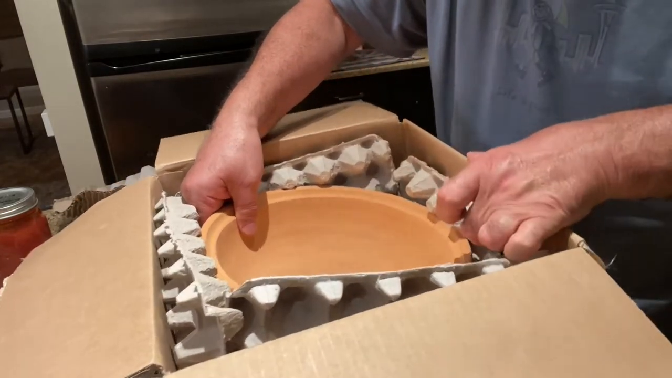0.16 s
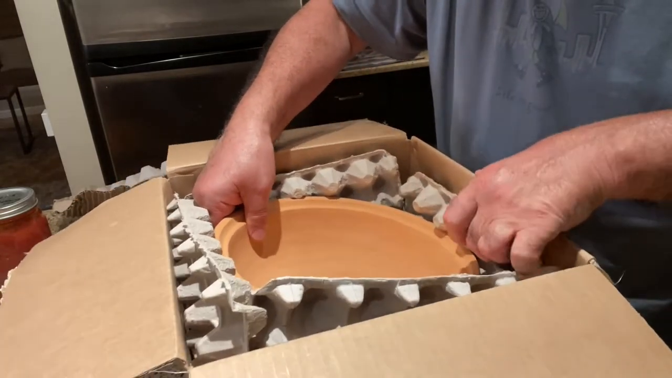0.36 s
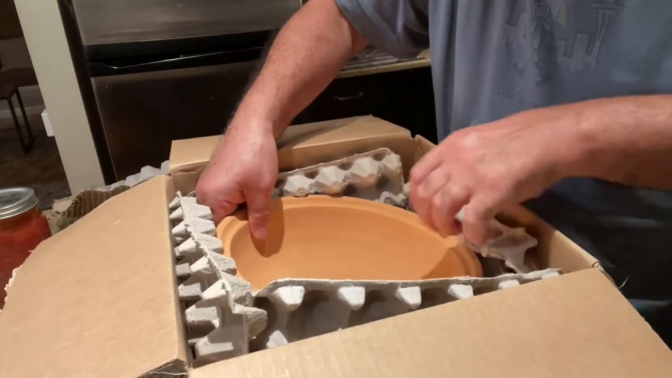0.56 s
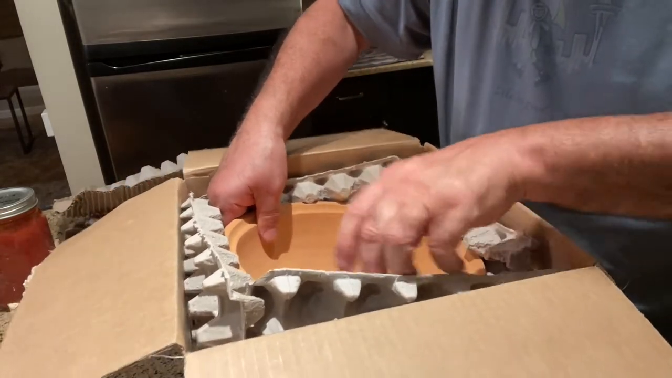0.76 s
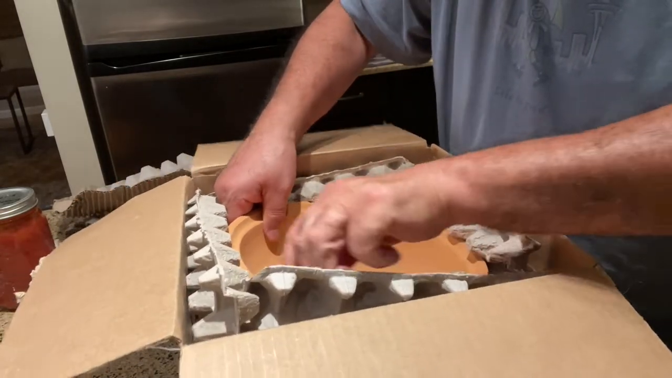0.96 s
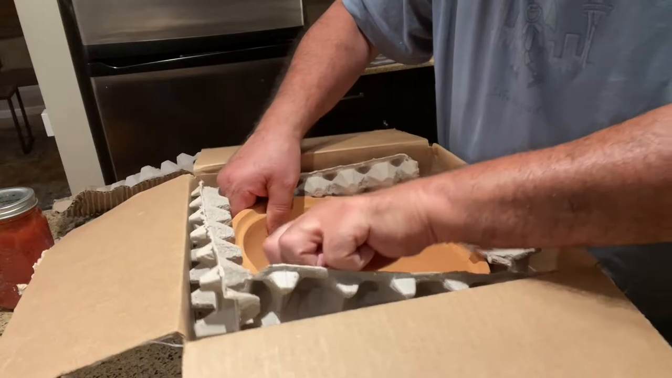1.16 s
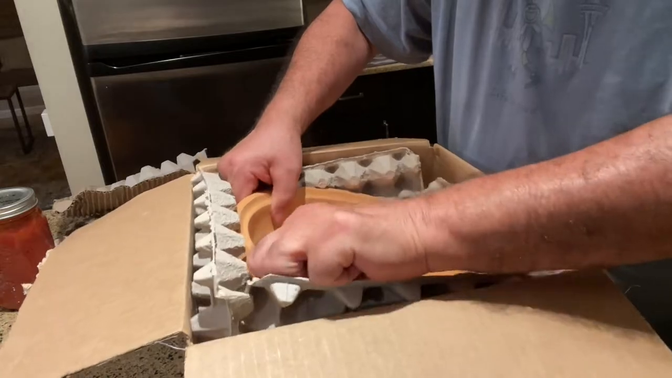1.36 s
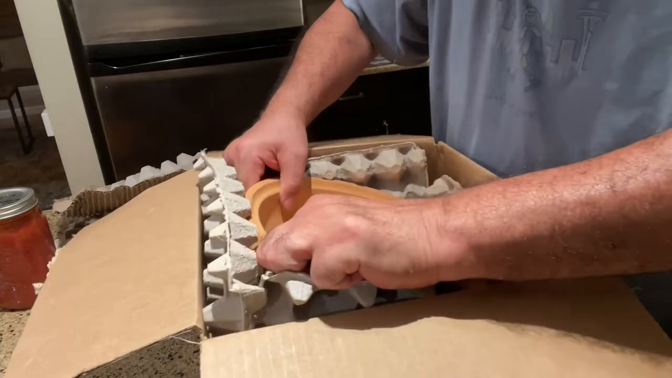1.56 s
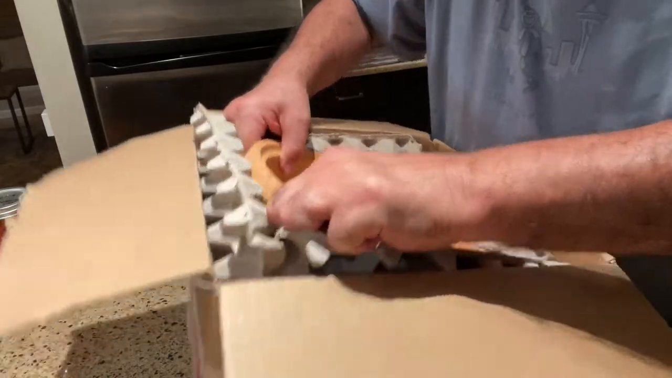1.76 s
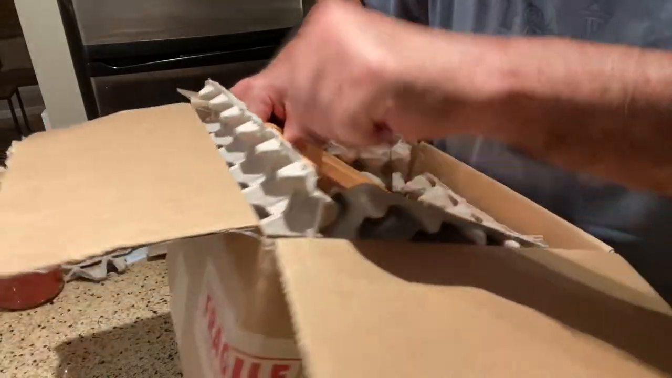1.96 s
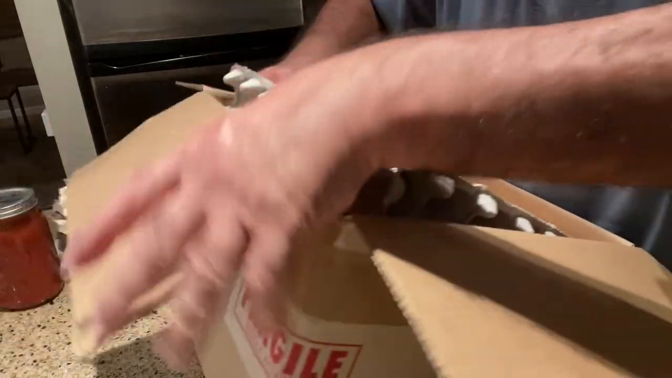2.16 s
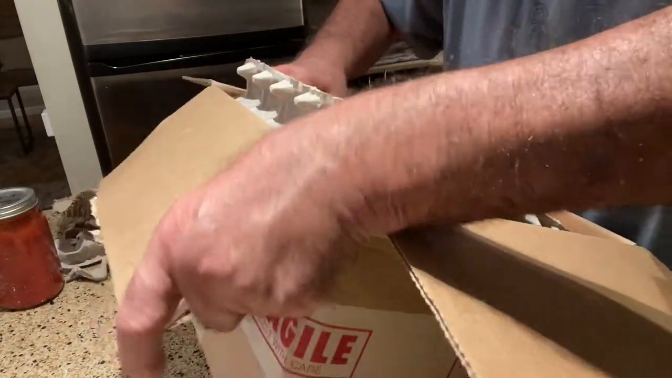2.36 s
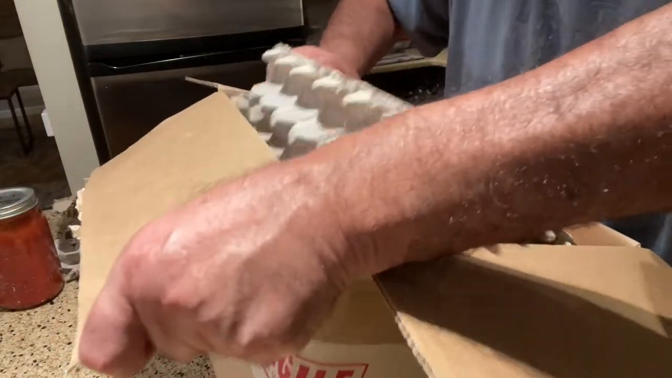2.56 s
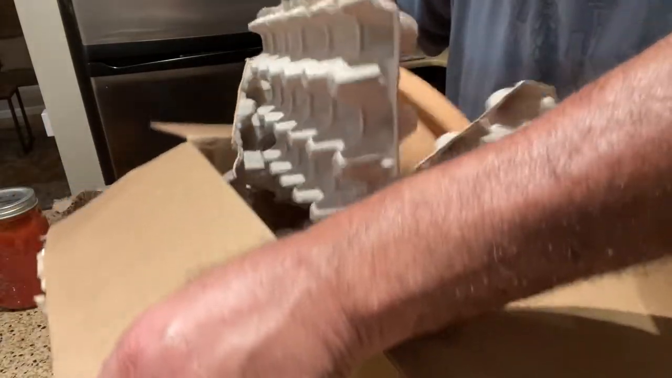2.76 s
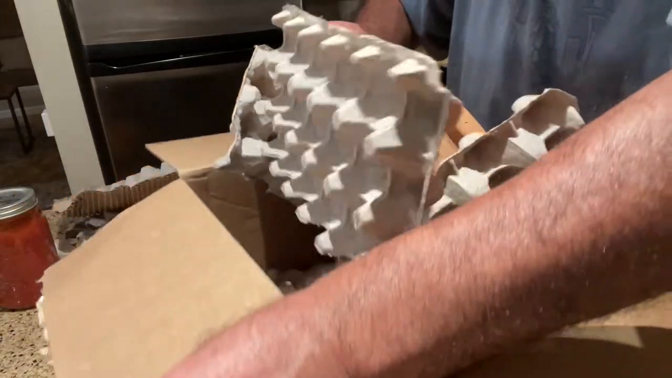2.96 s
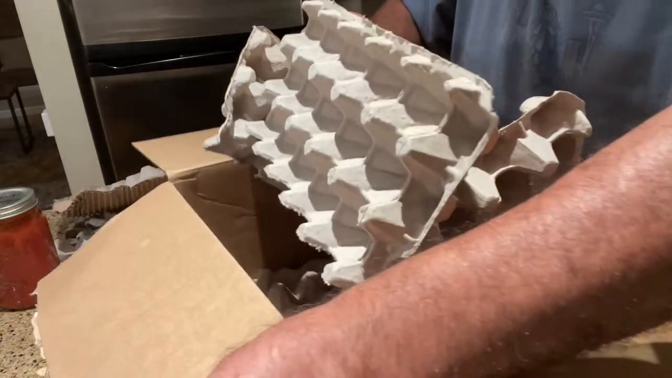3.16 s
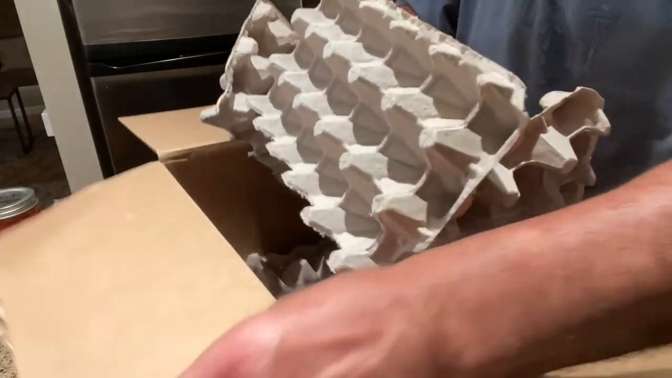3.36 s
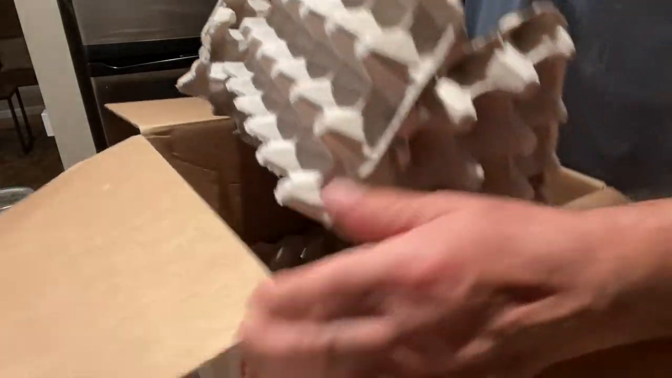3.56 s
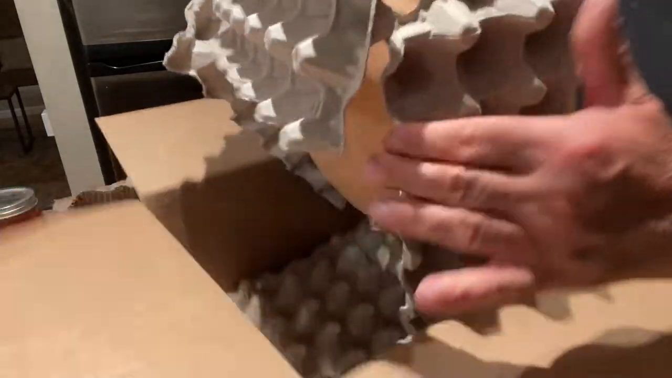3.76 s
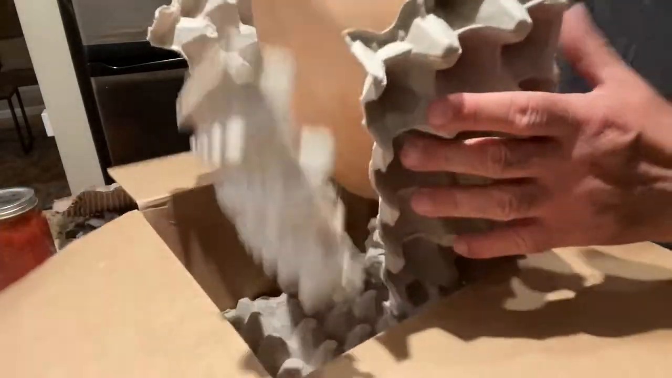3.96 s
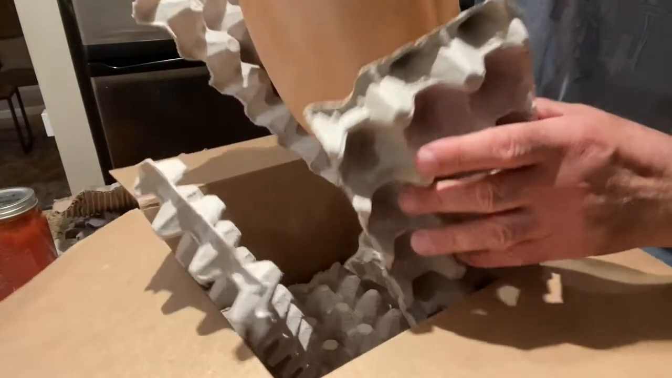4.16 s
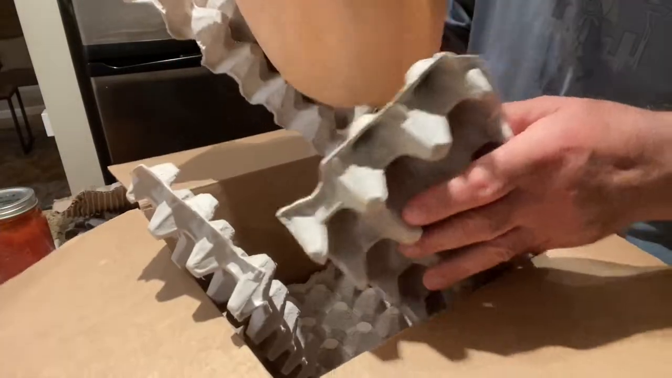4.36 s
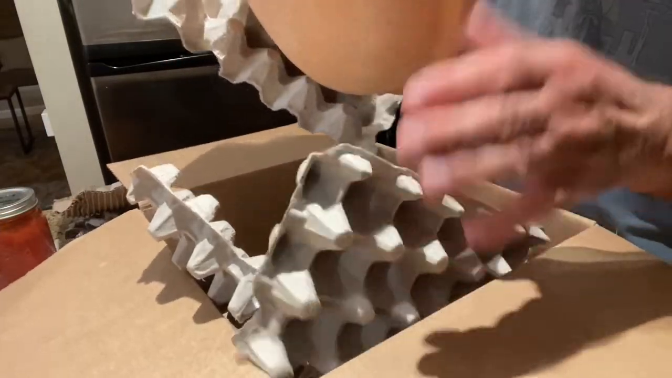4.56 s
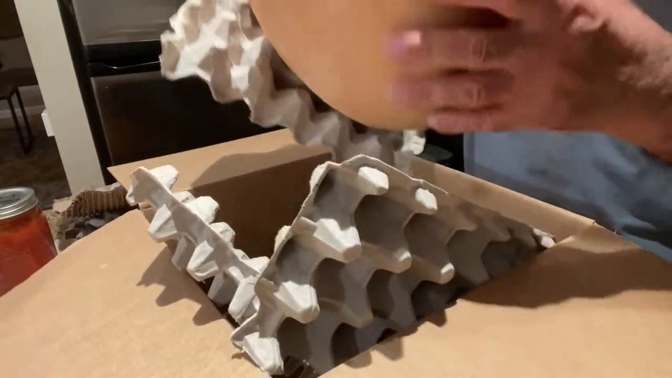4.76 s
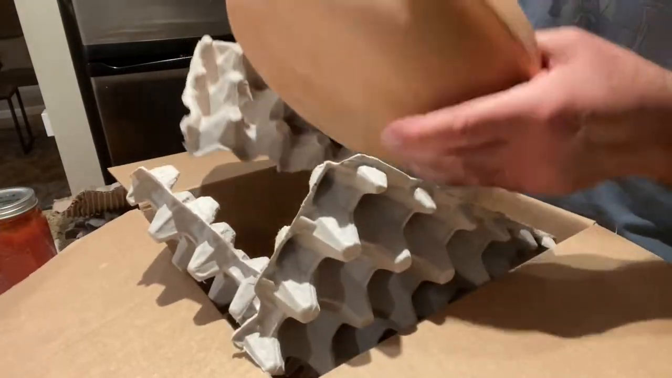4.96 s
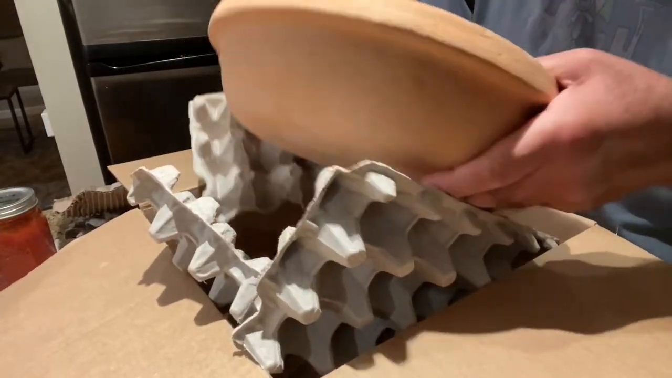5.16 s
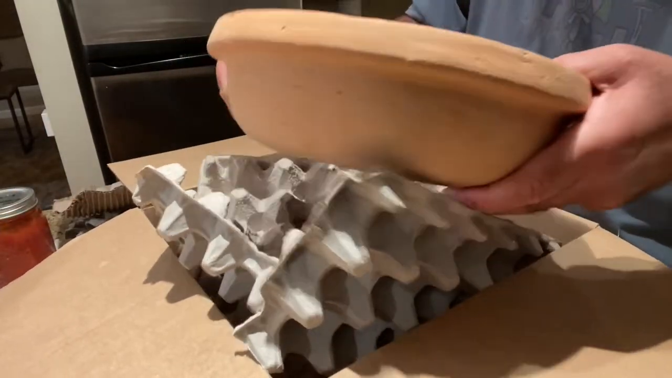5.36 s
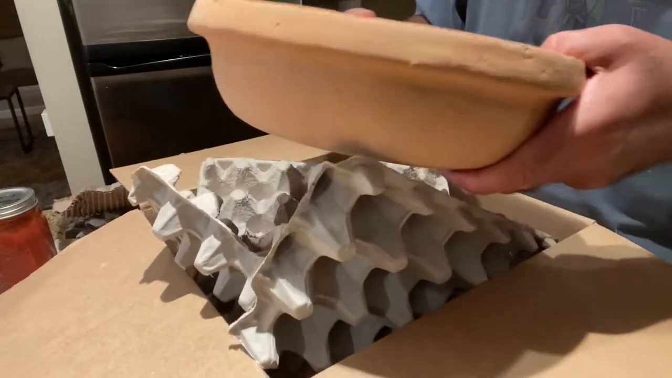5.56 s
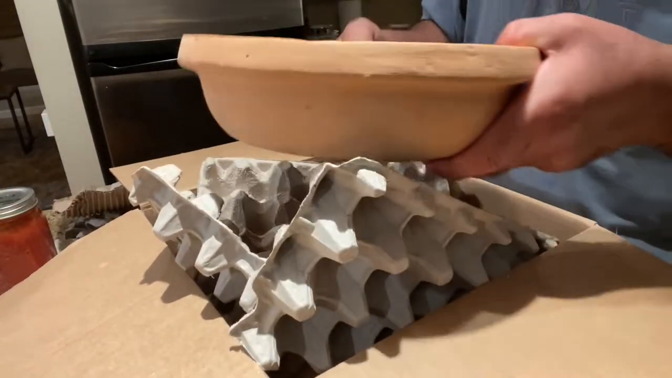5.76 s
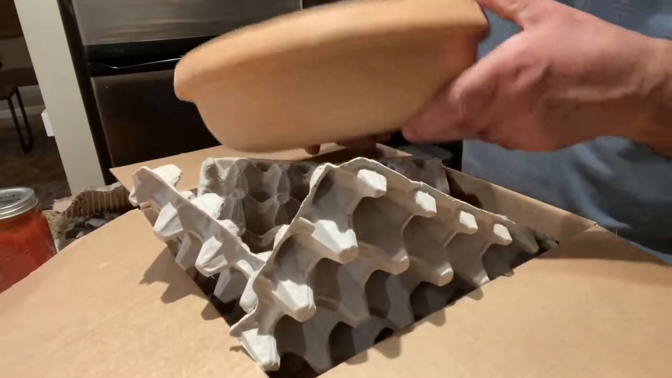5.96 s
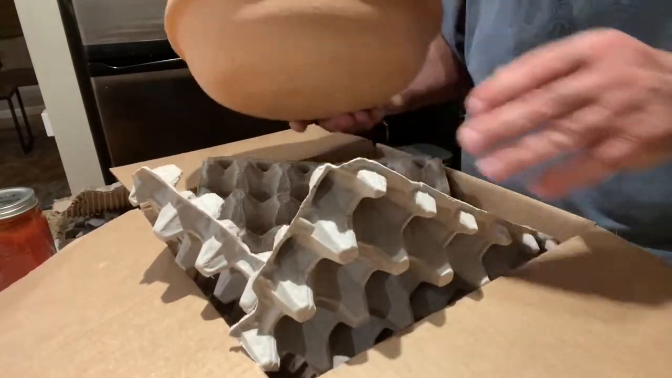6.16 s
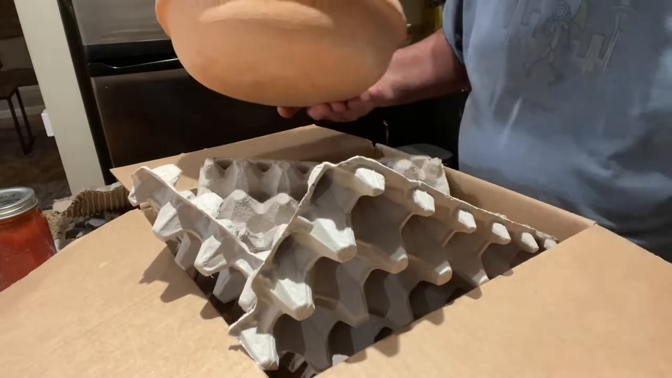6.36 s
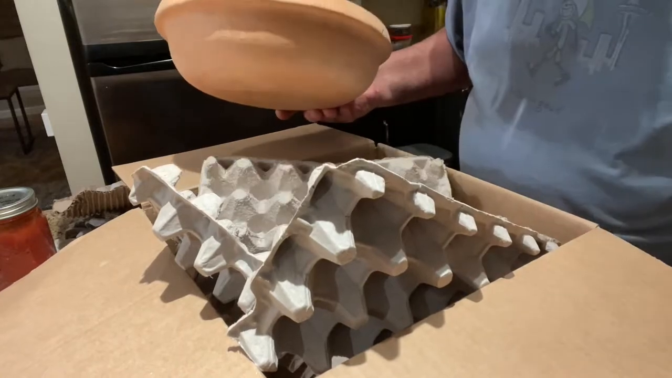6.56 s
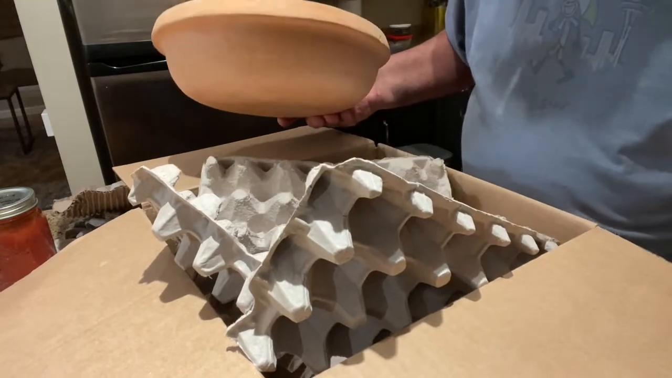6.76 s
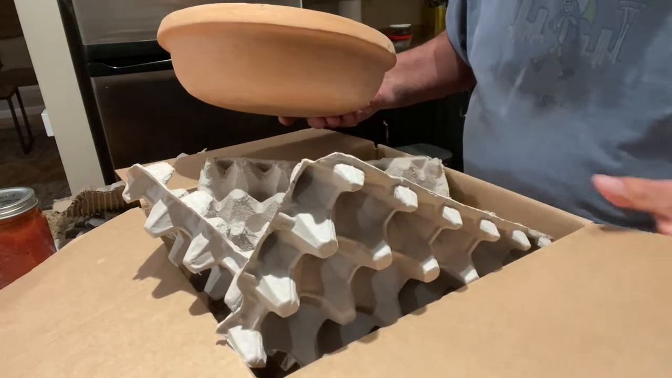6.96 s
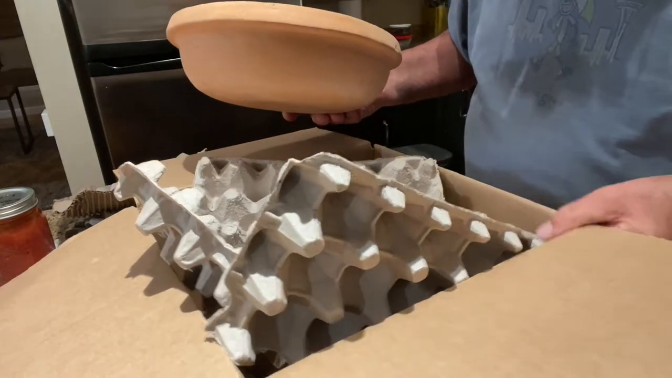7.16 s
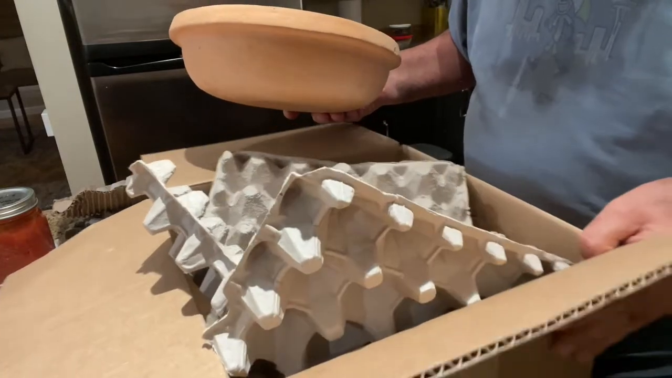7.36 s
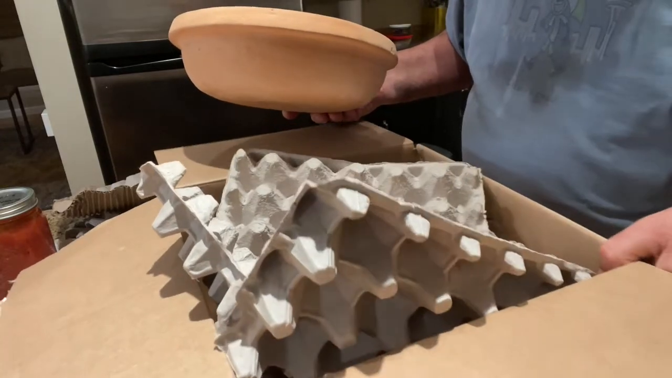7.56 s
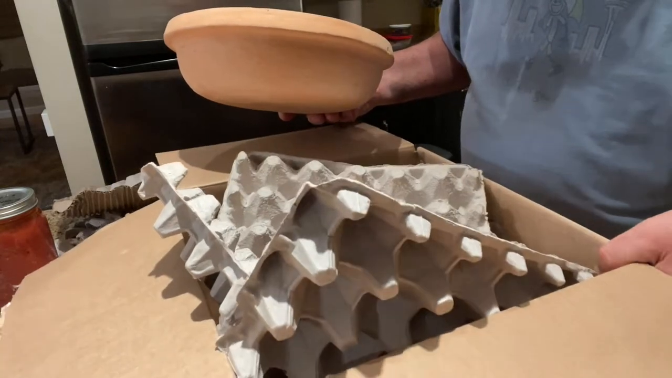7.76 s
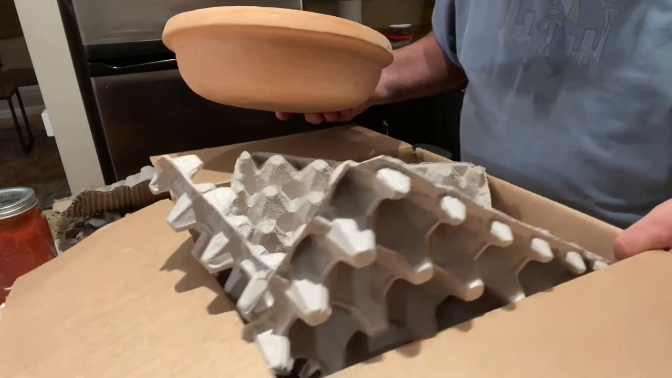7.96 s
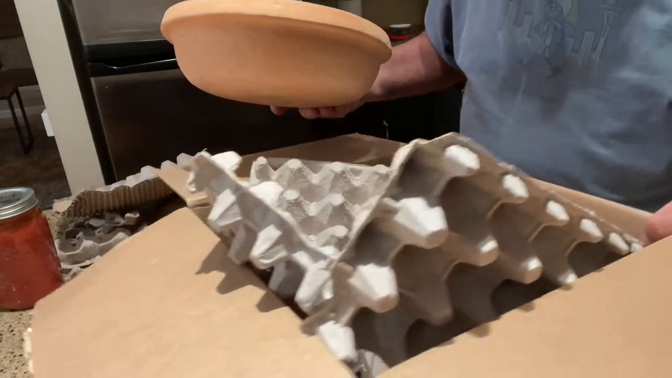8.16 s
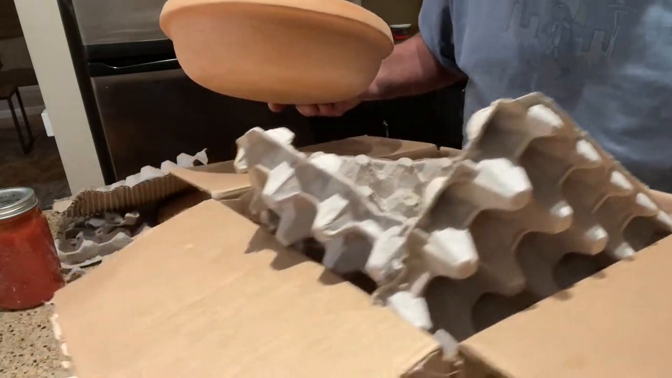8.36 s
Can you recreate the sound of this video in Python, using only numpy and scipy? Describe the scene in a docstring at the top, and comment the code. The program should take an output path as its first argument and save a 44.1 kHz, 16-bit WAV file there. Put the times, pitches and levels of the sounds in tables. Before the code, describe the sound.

Molded paper packing scrapes and rustles against cardboard, with hollow box thumps and pocking knocks as a clay pan is pulled free indoors.

```python
"""Paper scrapes and hisses on cardboard from the start, over faint room air and a hum; thumps and pocks join in.
A clay pan is worked out of a cardboard box packed with moulded paper trays, heard from close by in a kitchen.
Rubbing and scraping are random noise shaped by filters, some of it in one sliding pitch region.
Tray knocks are short noise bursts; box panels and the pan are sums of fading sine waves.
A palm rubs the bare pan so that it rings faintly, then a hand drags the box over the counter."""
import sys
import numpy as np
from scipy import signal
from scipy.fft import rfft, irfft, next_fast_len
from scipy.io import wavfile
from scipy.ndimage import uniform_filter1d, map_coordinates

SR = 44100
rng = np.random.default_rng(int(sys.argv[2]) if len(sys.argv) > 2 else 0)


def dump(signal):
    """Clip the signal to [-1, 1] and save it as 16-bit WAV at the path in sys.argv[1]."""
    limited = np.clip(np.atleast_2d(signal).T, -1, 1)
    pcm = np.round(limited * 32767).astype(np.int16)
    wavfile.write(sys.argv[1], SR, pcm)


N = 371322
T = np.arange(SR // 2) / SR  # time within one blow, in s


def amp(db):
    """Turn decibels into a plain multiplier."""
    return 10 ** (np.asarray(db) / 20)


def unit(x):
    """Scale a sound to an average (rms) strength of 1."""
    return x / np.sqrt(np.mean(x ** 2) + 1e-20)


def along(points, hz):
    """Read a value between (f/Hz, value) points, with frequency on a log scale."""
    f, v = np.transpose(points)
    return np.interp(np.log(hz + 1), np.log(f + 1), v)


def level_curve(rows):
    """Join (t/s, level/dB) points into one level per sample, as good as silent outside them."""
    s, db = np.transpose(rows)
    return np.interp(np.arange(N) / SR, s, db, left=-100, right=-100)


def wobble(rate):
    """A smooth random curve with this many random points a second."""
    knots = rng.standard_normal(int(N * rate / SR) + 4)
    return map_coordinates(knots, [np.arange(N) * rate / SR])


def filtered(x, response):
    """Pass x through a filter given as a function of frequency."""
    size = x.shape[-1]
    m = next_fast_len(size + 8192)
    spectrum = rfft(x, m) * response(np.fft.rfftfreq(m, 1 / SR))
    return irfft(spectrum, m)[..., :size]


def coloured(x, spectrum):
    """Shape the tone of x with a spectrum, then scale it to rms 1."""
    return unit(filtered(x, lambda hz: amp(along(spectrum, hz))))


def resonance(hz, centre, q):
    """Filter that rings at one pitch like a struck object; a higher q rings longer and purer."""
    damping = 1j * hz * centre / q
    return damping / (centre ** 2 - hz ** 2 + damping)


def fade(t60):
    """Dying away of one blow, by 60 dB in t60 seconds."""
    return np.exp(-np.log(1000) * T / t60)


def add(track, s, sound):
    """Mix a sound into a track at time s."""
    part = track[..., max(0, round(s * SR)):][..., :sound.shape[-1]]
    part += sound[..., :part.shape[-1]]


def slips(rate, spread_db, life):
    """Stick-slip rubbing: tiny noise bursts of uneven size at random moments, as a (direct, scattered) pair."""
    sizes = amp(spread_db * np.clip(rng.standard_normal(N), -2, 2))
    jumps = (rng.random(N) < rate / SR) * sizes
    energy = np.abs(signal.fftconvolve(jumps ** 2, fade(life / 2))[:N])
    return unit(np.sqrt(energy) * rng.standard_normal((2, N)))


def roaming(x, depth_db):
    """The contact point wanders, so each pitch region swells and sinks on its own."""
    z = signal.stft(x, nperseg=1024)[2]
    field = uniform_filter1d(rng.standard_normal(z.shape[1:]), size=5, axis=0)
    field = uniform_filter1d(field, size=9, axis=1)
    return signal.istft(z * amp(depth_db * unit(field)), nperseg=1024)[1][:, :N]


# tone of the room air: (f/Hz, relative level/dB)
AIR_TONE = [(15, -20), (25, -16.5), (55, 1.5), (119, -12.5), (156, -18), (209, -23), (313, -16), (368, -24),
            (2700, -29.5), (8810, -30), (11500, -32.5), (14300, -33), (15500, -25)]
# steady hum of a kitchen appliance: (f/Hz, level/dB)
APPLIANCE_HUM = [(48.4, -68.5), (155, -62), (307, -76)]


def background():
    """Faint noise of room air that rises and sinks a little, and an appliance humming with unsteady sines."""
    hum = np.zeros(N)
    for hz, db in APPLIANCE_HUM:
        angle = 2 * np.pi * hz * np.arange(N) / SR + .4 * wobble(5.0)
        hum += amp(db) * np.sqrt(2) * np.sin(angle)
    drift_db = 1.5 * wobble(7)
    air = amp(-52.5 + drift_db) * coloured(rng.standard_normal((2, N)), AIR_TONE)
    return air + np.array([hum, np.zeros(N)])


# steady contact while the packed pan works loose: (t/s, friction level/dB)
PULL_FRICTION = [(0.0, -36.5), (0.17, -48.5), (0.67, -54), (0.87, -35.5), (1.39, -27.5), (1.73, -31.5),
                 (1.93, -46.5), (2.15, -48.5), (2.28, -37), (2.67, -25.5), (3.31, -39.5), (3.55, -64),
                 (3.7, -29), (3.91, -29.5), (4.85, -51.5), (5.19, -39.5), (5.24, -26), (5.49, -50.5),
                 (5.6, -58)]
# steady contact while the box is dragged: (t/s, friction level/dB)
DRAG_FRICTION = [(6.7, -80), (6.8, -40.5), (6.924, -46), (7.476, -41), (7.614, -39.5), (7.96, -54.5),
                 (8.112, -55), (8.42, -71.5)]
# brushing strokes of paper over card, and a few very short bright ticks as trays and pan knock:
# (start t/s, length t/s, scrape level/dB, swell over the stroke level/dB, hiss over scrape level/dB)
STROKES_AND_TICKS = [(0.0, 0.037, -34, -8, -32), (0.239, 0.052, -35, 13, -12), (0.337, 0.1, -34.5, 6, -4.5),
                     (0.606, 0.082, -38, 16.5, -13.5), (0.657, 0.15, -35, -8.5, -4.5),
                     (0.799, 0.033, -28.5, 13, -7), (0.868, 0.077, -37, -8, -0.5),
                     (0.954, 0.096, -25.5, -3, -18.5), (1.077, 0.07, -25.5, 2.5, -14),
                     (1.181, 0.17, -23.5, -2.5, -12.5), (1.426, 0.063, -23.5, 2, -14),
                     (1.54, 0.031, -27.5, 8, -29.5), (1.649, 0.015, -33, -3, 0.5),
                     (1.709, 0.0075, -14.5, 9.5, -9.5), (1.826, 0.087, -36, 2, -7.5),
                     (2.083, 0.029, -32.5, 9, 2), (2.155, 0.02, -35.5, 13, 1.5),
                     (2.183, 0.032, -30.5, 7, -3.5), (2.265, 0.011, -27.5, 8, 3), (2.28, 0.13, -37.5, 3, 0),
                     (2.444, 0.12, -18.5, 3.5, -11), (2.544, 0.3, -24, -14, -16),
                     (3.197, 0.098, -40, 2.5, 4.5), (3.354, 0.1, -37.5, 1.5, -2.5),
                     (3.469, 0.036, -44, 20, 2.5), (3.507, 0.19, -22.5, -8.5, -10.5),
                     (3.663, 0.053, -36, 2, 1.5), (3.731, 0.064, -29, -17, -3), (3.924, 0.19, -35, 6, -7.5),
                     (4.247, 0.13, -36, 5.5, -9.5), (4.409, 0.047, -31.5, -3, -7),
                     (4.53, 0.0027, -20, 1, -20), (4.712, 0.096, -60, -5, 11.5),
                     (4.877, 0.2, -40, -13, -8.5), (5.034, 0.14, -33, 10, -6.5),
                     (5.233, 0.094, -30.5, 13.5, -12.5), (5.343, 0.029, -28, 2, -3),
                     (6.731, 0.1, -45, -8.5, 1), (6.875, 0.12, -42, 3.5, 2), (7.13, 0.11, -32.5, 3.5, -9.5),
                     (7.39, 0.068, -51.5, 2, 13.5), (7.624, 0.09, -36.5, 7.5, -3),
                     (7.753, 0.37, -45.5, -5, -21)]
# the bite takes a fixed time, or a share of the length in short strokes; then the release time
STROKE_ATTACK_S, STROKE_ATTACK_SHARE, STROKE_T60_S = 0.041, 0.29, 0.1
FIRM_DB = -32  # friction level of a firm contact
FIRM_HISS_DB, HISS_GROWS = -46.5, 0.41  # hiss at firm contact, and its dB per dB of pull friction
DRAG_SCRAPE_DB, DRAG_FIBRE_DB, DRAG_SHAKE_DB = 3.5, 1, -1  # over the friction of the dragged box
# panel shudder at firm contact, its dB per dB of friction, and how much of the strokes reaches it
SHAKE_DB, SHAKE_GROWS, SHAKE_BY_STROKE_DB = -32.5, 0.81, -6


def friction():
    """Strokes and ticks bite, swell or sink and let go over steady contact; both also shake the panels."""
    pull_db, drag_db = level_curve(PULL_FRICTION), level_curve(DRAG_FRICTION)
    # energies (squared gains) are added up, and the roots are taken at the end
    pull_hiss_db = FIRM_HISS_DB + HISS_GROWS * (pull_db - FIRM_DB)
    hiss = amp(pull_hiss_db) ** 2 + amp(drag_db + DRAG_FIBRE_DB) ** 2
    strokes = np.zeros(N)
    for s, length, db, swell_db, hiss_db in STROKES_AND_TICKS:
        bite = np.clip(T / min(STROKE_ATTACK_S, STROKE_ATTACK_SHARE * length), 0, 1)
        release = np.exp(-np.log(1000) * np.maximum(T - length, 0) / STROKE_T60_S)
        swell = amp(db + swell_db * (np.minimum(T / length, 1) - .5))
        stroke = swell * bite * release
        add(strokes, s, stroke ** 2)
        add(hiss, s, (stroke * amp(hiss_db)) ** 2)
    scrape = amp(pull_db) ** 2 + amp(drag_db + DRAG_SCRAPE_DB) ** 2 + strokes
    shake = amp(pull_db) ** 2 + amp(drag_db + DRAG_SHAKE_DB) ** 2
    shake = shake + strokes * amp(SHAKE_BY_STROKE_DB) ** 2
    shudder_gain = amp(SHAKE_DB) * (np.sqrt(shake) / amp(FIRM_DB)) ** SHAKE_GROWS
    return np.sqrt(scrape), np.sqrt(hiss), shudder_gain


# ringing tones of the half-empty box: (f/Hz, Q, relative level/dB)
BOX_HOLLOW = [(332.5, 5.5, 17), (455, 18, 8), (786, 20, 7), (1228, 13, -0.5), (1696, 35, -4),
              (2375, 40, 3.5)]


def hollow(x, ring_db, vary_db, shift):
    """Air and walls of the box ring on; the place of contact sets each tone's strength and tuning."""
    luck = rng.standard_normal((len(BOX_HOLLOW), 2))

    def ringing(hz):
        total = 0
        for (centre, q, db), (loud, sharp) in zip(BOX_HOLLOW, luck):
            gain = amp(ring_db + db + vary_db * loud)
            total = total + gain * resonance(hz, centre * (1 + shift * sharp), q)
        return total

    return x + filtered(x, ringing)


# snags a second, their middle pitch, and the cycles in which each fades by 60 dB
CRACKLE_PER_S, CRACKLE_HZ, CRACKLE_CYCLES = 420, 1400, 13


def crackles():
    """Ridges of pulp snag and let go, each with its own size and short pitched ring."""
    count = round(CRACKLE_PER_S * N / SR)
    start, phase = rng.random((count, 2)).T[:, :, None]
    pitch, size = np.clip(rng.standard_normal((count, 2)), -2, 2).T[:, :, None]
    hz = CRACKLE_HZ * np.exp(.55 * pitch)
    age = np.arange(420)  # samples since the snag
    cycles = hz * age / SR
    ring = amp(3.7 * size - 60 * cycles / CRACKLE_CYCLES) * hz * (1 - np.exp(-cycles))
    at = ((start * N).astype(int) + age).ravel()
    sides = []
    for shift in (0, phase):
        wave = ring * np.sin(2 * np.pi * (cycles + shift))
        sides.append(np.bincount(at, wave.ravel(), N)[:N])
    return unit(np.array(sides))


# tone of the shuddering panels: (f/Hz, relative level/dB)
SHUDDER_TONE = [(20, -39), (43, -3), (60, -6.5), (105, -3), (130, 0.5), (175, -8.5), (240, -7.5), (330, -5),
                (420, -14), (800, -49)]
# tone of the scraping trays: (f/Hz, relative level/dB)
SCRAPE_TONE = [(150, -39), (270, -20.5), (335, -1), (420, -4.5), (560, 1.5), (780, 0.5), (950, -0.5),
               (1250, -2.5), (1700, -5.5), (2300, -6), (3200, -8.5), (5500, -14), (8000, -19.5),
               (12000, -63.5)]
# tone of the hissing paper fibres: (f/Hz, relative level/dB)
FIBRE_TONE = [(800, -16.5), (2200, -1), (3400, 3.5), (5000, 1), (7000, 6.5), (9000, 2.5), (11500, 3.5),
              (13500, -6), (16000, 3.5)]
CRACKLE_SHARE = .54  # strength of the crackles beside the scrape


def sliding():
    """Coarse slips shake the panels, finer ones and snagging ridges sound in the trays, countless fibres hiss."""
    scrape_gain, hiss_gain, shudder_gain = friction()
    shudder = coloured(slips(rate=250, spread_db=6.5, life=0.06), SHUDDER_TONE)
    scrape = roaming(slips(rate=2200, spread_db=2.5, life=.02), depth_db=1.9)
    hiss = roaming(slips(rate=4000, spread_db=3, life=.014), depth_db=2.2)
    scrape = coloured(hollow(scrape, ring_db=-11.5, vary_db=-0.5, shift=0), SCRAPE_TONE)
    scrape = unit(scrape + CRACKLE_SHARE * coloured(crackles(), SCRAPE_TONE))
    grip = amp(.6 * wobble(30))  # the grip is slightly uneven
    moving = shudder_gain * shudder + amp(-2.0) * scrape_gain * scrape
    return grip * (moving + hiss_gain * coloured(hiss, FIBRE_TONE))


# how long the room rings: (f/Hz, time to fade by 60 dB t/s)
ROOM_FADE = [(60, 0.23), (300, 0.61), (2000, 0.038), (12000, 0.19)]


def kitchen(x):
    """The room answers with a short tail from all sides: noise that fades at its own speed for each pitch."""
    hz, t, z = signal.stft(rng.standard_normal((2, len(T))), SR, nperseg=256)
    fading = amp(-60 * t / along(ROOM_FADE, hz)[:, None])
    tail = signal.istft(z * fading, SR, nperseg=256)[1][:, :len(T)] * (1 - fade(0.0022))
    return signal.fftconvolve(x[:1], tail / np.linalg.norm(tail[0]), axes=1)[:, :N]


# box panels flexing: (t/s, level/dB, panel pitch f/Hz, extra for the upper tones level/dB)
BOX_THUMPS = [(0.233, -22.5, 149, -2), (0.283, -13.5, 76, 5.5), (0.685, -8.5, 144, 1.5),
              (0.871, -15.5, 140, 3.5), (1.042, -23.5, 142, 11.5), (1.105, -26.5, 138, 6),
              (1.598, -12, 124.5, 8), (1.722, -14, 123, 16.5), (1.74, -5.5, 146.7, 0),
              (2.097, -16.5, 118, 7.5), (2.214, -12, 98.4, 5), (2.28, -6, 129.6, 8),
              (2.513, -28, 150.5, 20), (2.618, -3.5, 105, -7.5), (2.663, 0.5, 91.4, -5.5),
              (3.625, -27, 125, 27.5), (3.759, 0.5, 81, -1.5), (3.788, -1.5, 130, -4.5),
              (4.057, -14, 127.5, 11), (4.089, -12.5, 106.5, -7.5), (4.452, -19, 119, -10),
              (4.538, -7.5, 127, -7), (4.94, -43, 124, -17), (5.209, -18, 127, -5),
              (5.261, -15.5, 139, 9.5), (5.31, -13, 117.8, 1.5), (5.385, -24.5, 112.2, 1.5),
              (7.234, -8.5, 125, -4.5), (7.576, -12, 112.5, -23), (7.681, -16, 103.4, 6)]
# tones of one panel: (ratio to the panel pitch, relative level/dB, basic ring time t/s)
PANEL_TONES = [(.55, -16, 0.26), (1.003, -0.5, 0.24), (1.349, -2, 0.12), (1.8, -5.5, 0.14),
               (2.15, -13, 0.21), (2.618, -2.5, 0.084), (3.599, -13.5, 0.1)]
# how freely panels ring, first packed, then emptied, then held: (t/s, factor on the ring time)
RING_FREEDOM = [(0, 0.68), (3.8, 0.4), (4.1, 1.27), (4.5, 1.37), (5.3, 0.87), (7.2, 0.45)]


def box():
    """Each bump rings a cardboard panel as fading sines; sharper bumps reach its upper tones."""
    out = np.zeros((2, N))
    ratio, mode_db, t60 = np.transpose(PANEL_TONES)[:, :, None]
    upper = np.clip(ratio - 1, 0, 1)
    for s, db, pitch_hz, upper_db in BOX_THUMPS:
        freedom = np.interp(s, *np.transpose(RING_FREEDOM))
        # the upper tones depend on where the panel is hit
        detune, vary, phase = upper * rng.standard_normal((3, len(PANEL_TONES), 1))
        hz = pitch_hz * ratio * (1 + 0.058 * detune)
        level = amp(db + mode_db + 2 * vary + upper_db * upper)
        size = level * fade(t60 * freedom) * (1 - np.exp(-T / 0.0032))
        sides = [np.sum(size * np.sin(2 * np.pi * hz * T + shift), axis=0)
                 for shift in (0, np.pi / 2 + phase)]
        add(out, s, np.array(sides))
    return out


# paper trays catching and landing: (t/s, level/dB, tone f/Hz)
TRAY_TAPS = [(0.234, -20, 520), (0.279, -14.5, 520), (0.68, -14.5, 860), (0.712, -20, 780),
             (0.813, -27, 1090), (0.835, -23.5, 980), (0.867, -15, 490), (1.04, -9.5, 855),
             (1.124, -18.5, 340), (1.549, -16, 501), (1.598, -17.5, 673), (1.709, -10.5, 765),
             (1.721, -3, 740), (2.278, -10, 930), (2.455, -20.5, 1494), (2.513, -8.5, 350),
             (2.616, -8.5, 738), (2.654, -15.5, 1130), (2.754, -15, 360), (2.79, -2.5, 925),
             (2.934, -22, 1050), (2.99, -24.5, 875), (3.035, -21, 1183), (3.234, -24, 800),
             (3.624, -14.5, 1210), (3.633, -14.5, 382), (3.75, -12, 606), (3.802, -1, 920),
             (3.808, -2.5, 630), (3.883, -12.5, 850), (3.906, -17.5, 690), (3.97, -28, 1590),
             (3.996, -14, 1091), (4.051, -18.5, 1420), (4.054, -1, 704), (4.061, -4.5, 560),
             (4.074, -5, 790), (4.222, -21.5, 764), (4.532, -9, 600), (4.7, -39, 1470), (4.74, -41.5, 1320),
             (5.161, -14, 1270), (5.222, -18.5, 750), (5.256, -7, 1030), (5.304, -11.5, 765),
             (5.319, -18.5, 886), (5.386, -22.5, 754), (6.763, -32.5, 1430), (6.765, -28.5, 604),
             (7.161, -19, 342), (7.905, -31, 363)]
# level and burst fade time of a typical tap; harder taps die sooner, twice as fast per TAP_HALVES_DB
TAP_REF_DB, TAP_T60_S, TAP_HALVES_DB = 1.5, 0.029, 36.5
CRACK_DB, CRACK_GROWS = -20.5, 1  # the crack of a typical tap, and its dB per dB of the tap
TAP_DAMP_S = .24  # the packing smothers each tap (fades it by 60 dB in this time)
HOLLOW_SHIFT = .03  # how far the box tones move from blow to blow, as a share


def trays():
    """A tray buckles with a snap and a noise burst: a short pitched pock rings the box, with a dry crack on top."""
    out = np.zeros((2, N))
    size = SR // 6
    soft = signal.butter(2, 2600, fs=SR, output="sos")  # the soft pulp blunts the blow
    for s, db, tone_hz in TRAY_TAPS:
        force_db = db - TAP_REF_DB
        t60 = TAP_T60_S * .5 ** (force_db / TAP_HALVES_DB)
        strength = np.linalg.norm(fade(t60))
        burst = rng.standard_normal((2, size)) * (fade(t60) * (1 - fade(0.011)))[:size]
        burst[0, SR // 800] += .42 * strength  # the snap comes just after the first give
        pock = filtered(signal.sosfilt(soft, burst),
                        lambda hz: resonance(hz, tone_hz, 3.64) * resonance(hz, tone_hz, 0.15))
        pock = hollow(pock, ring_db=-4, vary_db=2.5, shift=HOLLOW_SHIFT) * fade(TAP_DAMP_S)[:size]
        crack = rng.standard_normal((2, size)) * (fade(1.5 * t60) * (1 - fade(.004)))[:size]
        crack = filtered(crack, lambda hz: resonance(hz, 2500, 1.0))
        for sound, level_db in ((pock, db), (crack, CRACK_DB + CRACK_GROWS * force_db)):
            even = sound / np.linalg.norm(sound, axis=1, keepdims=True)
            add(out, s, amp(level_db) * strength * even)
    return out


# ringing tones of the clay pan: (f/Hz, relative level/dB, time to fade by 60 dB t/s)
CLAY_TONES = [(880, -0.5, .25), (1520, 3, .2), (1740, 0.5, .25), (2280, 3.5, .2), (2464, 0, .25),
              (2630, -2, .2), (3130, 8, .15), (3470, 2, .18), (3540, 4, 0.22), (4095, 8, 0.099),
              (4400, -4.5, .1), (4890, 2, 0.068), (5105, 1, .13), (5450, 0, .09), (6200, 5.5, .06),
              (6960, 3.5, 0.044)]


def clay(rasp, vary_db):
    """One ring of the pan as fading sines, with a short noisy rasp of the contact itself."""
    hz, db, t60 = np.transpose(CLAY_TONES)[:, :, None]
    modes = amp(db + vary_db * rng.standard_normal(db.shape)) * fade(t60)
    sides = [np.sum(modes * np.sin(2 * np.pi * (hz * T + rng.random(hz.shape))), axis=0)
             for _ in range(2)]
    ring = np.array(sides)
    contact = filtered(rng.standard_normal(ring.shape), lambda f: resonance(f, 3900, 0.43))
    return ring / np.abs(ring).max() + rasp * fade(0.03) * contact


# a palm on the pan: (t/s, rub level/dB)
PALM_RUB = [(4.6, -54.5), (4.85, -52.5), (5.2, -40), (5.45, -71), (5.72, -48.5), (5.8, -53), (5.88, -43),
            (6.0, -52), (6.06, -60.5)]
# nails, fingers and tray edges striking the pan: # (t/s, peak level/dB, brightest f/Hz, fading by 60 dB in t/s)
PAN_TOUCHES = [(0.682, -21, 5500, .03), (0.712, -20.5, 5200, .06), (0.814, -25, 5500, .04),
               (1.037, -13.5, 6360, .12), (1.041, -17.5, 3480, 0.13), (1.707, -7, 4200, 0.028),
               (1.724, -15, 2800, .06), (3.803, -16.5, 2330, .04), (5.121, -19.5, 3600, .2),
               (6.036, -30.5, 2500, 0.25)]
# skin noise and contact click beside the ring; how narrowly a touch picks its tones
RUB_RASP, TOUCH_CLICK, TOUCH_Q = 0.54, 0.75, 2.1


def pan():
    """Skin rasps on unglazed clay, waking now these tones, now those; a touch rings those near its brightness."""
    muted = clay(RUB_RASP, vary_db=3.5) * fade(.2)  # the palm damps the clay
    rub = signal.fftconvolve(rng.standard_normal((2, N)), muted, axes=1)[:, :N]
    rub = roaming(rub, depth_db=3.4)
    clock = np.arange(N) + 10 * wobble(14)  # the shifting grip bends the tones a little
    bent = np.array([np.interp(clock, np.arange(N), side) for side in rub])
    out = amp(level_curve(PALM_RUB)) * unit(bent)
    for s, db, bright_hz, t60 in PAN_TOUCHES:
        ring = clay(TOUCH_CLICK, vary_db=2.5) * fade(t60)
        ring = filtered(ring, lambda hz: resonance(hz, bright_hz, TOUCH_Q))
        add(out, s, amp(db) * ring / np.abs(ring).max())
    return out


# rubs in one pitch region: edge squeaks and groans, soft brushes, a hand hissing on cardboard,
# the box juddering on the counter:
# (t/s, length t/s, middle f/Hz, glide as a share of it, Q, level before the soft ends/dB)
PITCHED_RUBS = [(1.2, 0.12, 1870, -.2, 9.4, -32), (2.468, 0.16, 957, 0.04, 17, -21.5),
                (2.565, 0.07, 1750, -0.1, 4, -27), (2.854, 0.061, 1645, 0.13, 7, -30.5),
                (2.916, 0.12, 2045, -0.07, 12, -32), (3.16, 0.052, 3840, 0.046, 0.51, -37),
                (3.224, 0.096, 770, 0.082, 9.7, -37), (4.93, 0.05, 313, -0.04, 40, -29),
                (5.08, .1, 3600, 0, .69, -29.5), (5.135, .04, 1700, -.2, 2.2, -26.5),
                (6.234, .1, 2600, 0, 1, -59.5), (6.541, .035, 3980, 0.043, 1.2, -49),
                (6.746, .32, 11300, -0.12, 1.8, -43.5), (6.793, 0.06, 2434, 0.19, 3.1, -44.5),
                (7.145, 0.081, 1347, 0.063, 4.5, -37), (7.148, 0.07, 3780, -0.16, 3, -28.5),
                (7.616, 0.14, 760, 0.097, 15, -38.5), (6.8, .14, 124.3, 0, 5.4, -41.5),
                (7.22, 0.17, 124, 0, 5, -38.5), (7.53, .23, 108, -.1, 2.3, -35)]
SING_Q = 12  # from this Q up a rub locks into a steady squeak or groan


def pitched_rubs():
    """Rubbing noise rings in one pitch region that may slide; the narrower it is, the more evenly it sings."""
    out = np.zeros((2, N))
    chatter = slips(rate=2000, spread_db=2.5, life=.012)
    for s, length, tone_hz, glide, q, db in PITCHED_RUBS:
        size = round(length * SR)
        rub = filtered(chatter[:, round(s * SR):][:, :2 * size],
                       lambda hz: resonance(hz, tone_hz, q) * resonance(hz, tone_hz, 0.92))
        loudness = np.abs(signal.hilbert(rub)) + 1e-9
        rub = rub / loudness ** min(q / SING_Q, 1)  # even out the ups and downs
        # reading the sound at a changing speed slides its pitch
        clock = size / 2 + np.cumsum(1 + glide * np.linspace(-.5, .5, size))
        rub = np.array([map_coordinates(side, [clock]) for side in rub])
        add(out, s, amp(db) * signal.windows.tukey(size, 1 / 3) * unit(rub))
    return out


# how alike the two microphones hear: (f/Hz, likeness, held between 0 and 1 when used)
MIC_ALIKE = [(60, 0.5), (130, 0.9), (300, 0.63), (700, 0.15), (1500, 0.52), (3000, 0), (6000, 0.15),
             (8500, 0.86), (16000, 35.5)]
# how far the left microphone leads: (f/Hz, phase in radians)
MIC_LEAD = [(0, 0), (700, -.4), (1300, -.3), (2300, -1), (4700, -.8), (7100, 1.9), (9000, 3.14),
            (11700, 6.28), (14400, 9.42), (16000, 10.6)]
# balance of the microphones: (f/Hz, left minus right level/dB)
MIC_LEAN = [(60, -3.5), (400, -4.2), (2000, -2.5), (8000, 0)]


def scene():
    """Direct and scattered sound reach two microphones, with a phase lead that turns with frequency."""
    near = sliding() + pitched_rubs() + trays() + box() + pan()
    field = near + amp(-11.0) * kitchen(near) + background()

    def split(hz):
        turn = np.arccos(np.clip(along(MIC_ALIKE, hz), 0, 1)) / 2
        return np.array([np.cos(turn), np.sin(turn)])

    def left_right(hz):
        half = amp(along(MIC_LEAN, hz) / 2) * np.exp(.5j * np.interp(hz, *np.transpose(MIC_LEAD)))
        return np.array([half, 1 / half])

    direct, scattered = filtered(field, split)
    return filtered(np.array([direct + scattered, direct - scattered]), left_right)


TOP_HZ = 15800  # band limit


def record(dry):
    """The deepest bass rolls off, the loudest knocks flatten, and nothing passes above the band limit."""
    x = signal.sosfilt(signal.butter(4, 48, "high", fs=SR, output="sos"), dry)
    flattened = x / (1 + x ** 6) ** (1 / 6)
    return filtered(flattened, lambda hz: hz < TOP_HZ)


dry = scene()
out = record(dry)
dump(out)
```